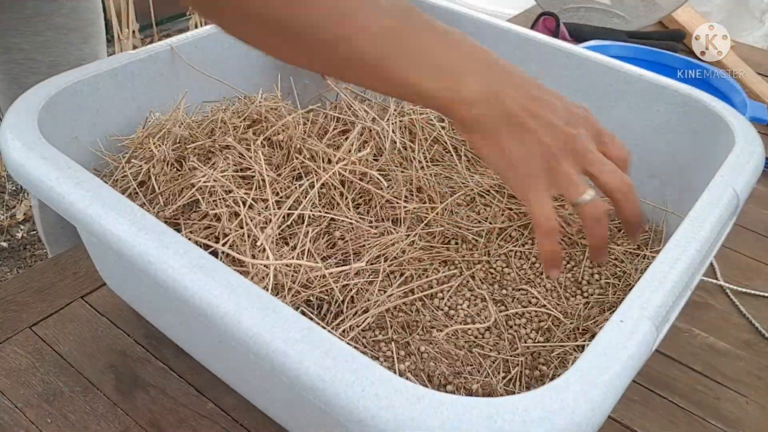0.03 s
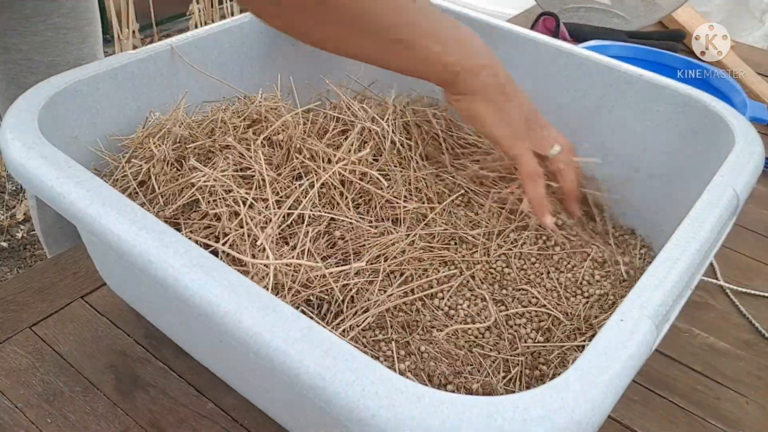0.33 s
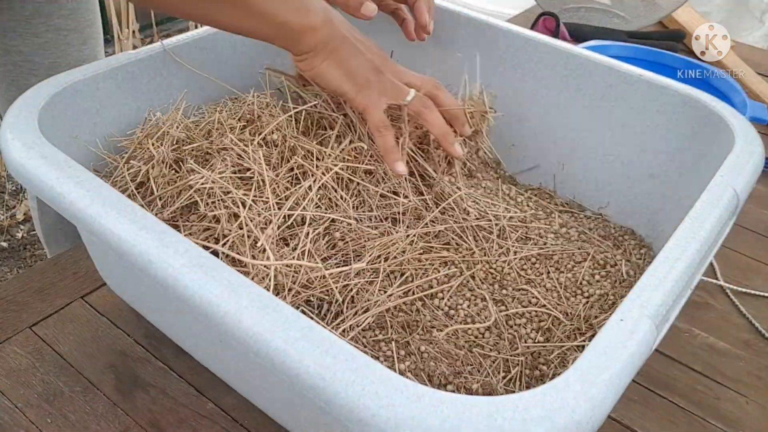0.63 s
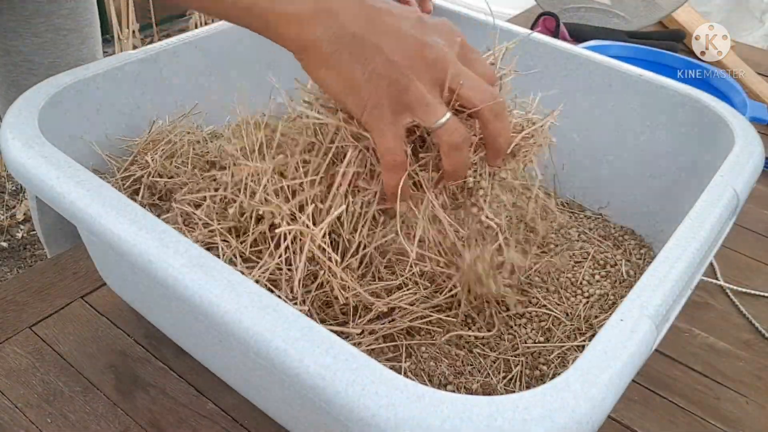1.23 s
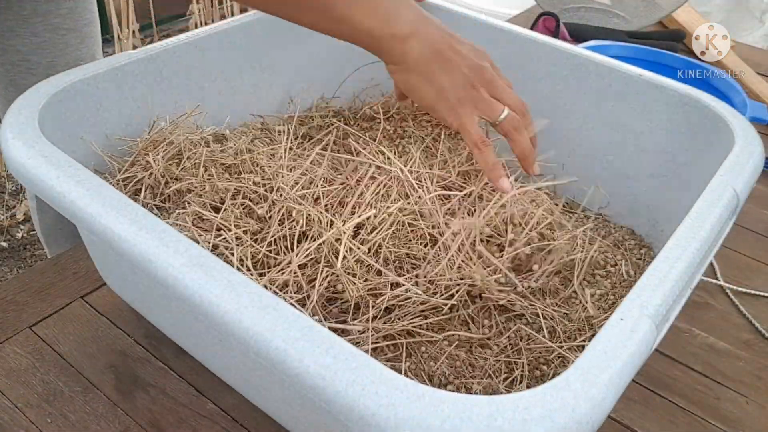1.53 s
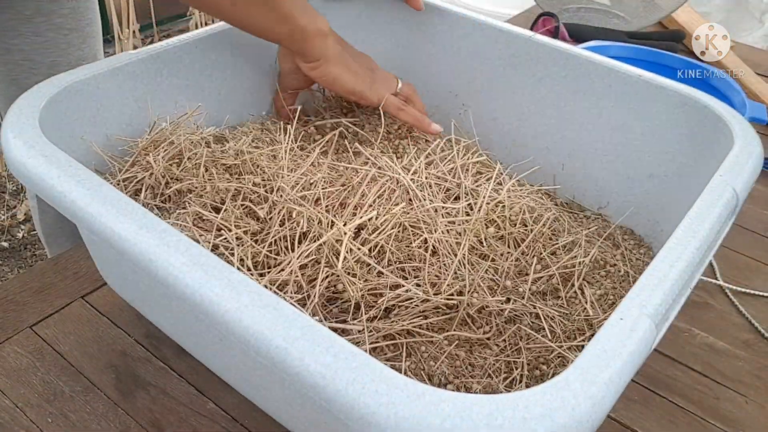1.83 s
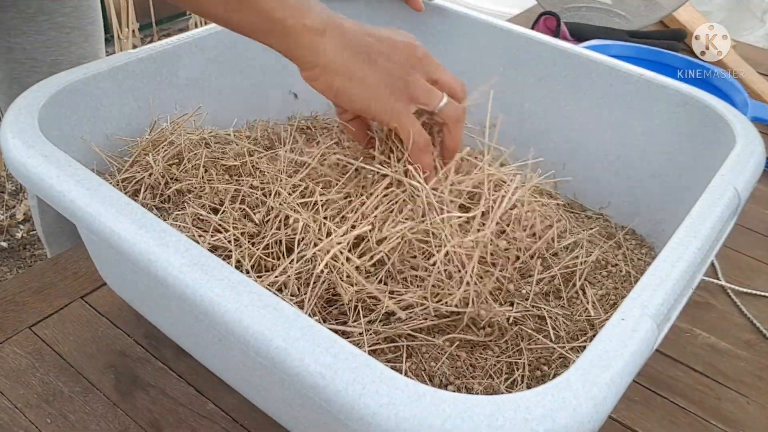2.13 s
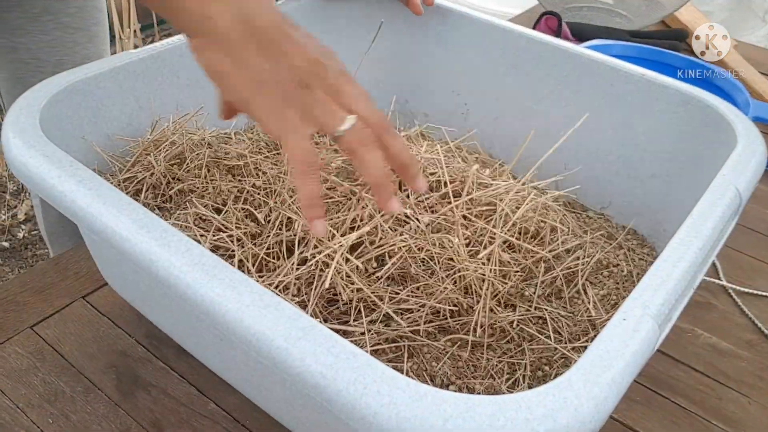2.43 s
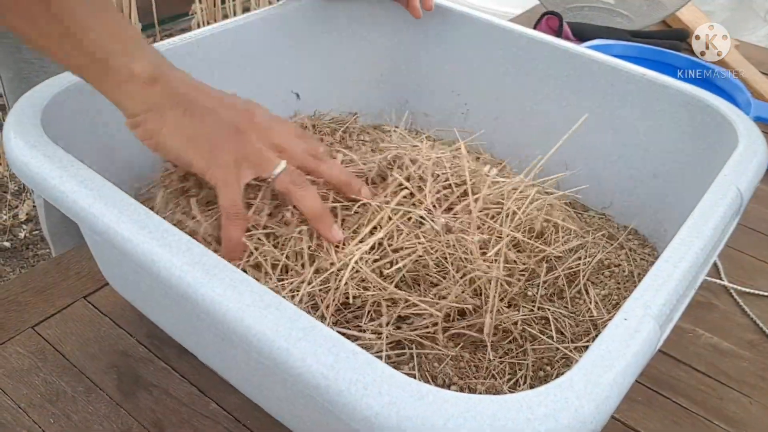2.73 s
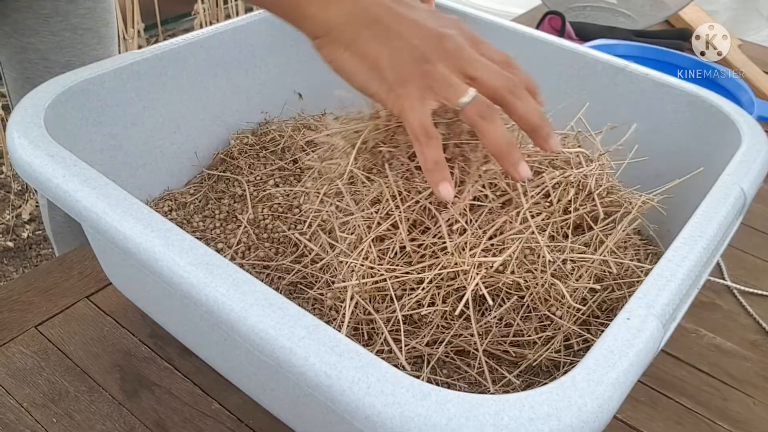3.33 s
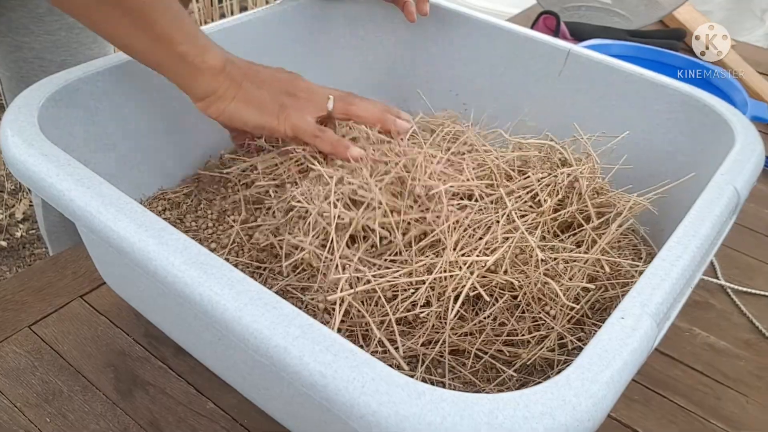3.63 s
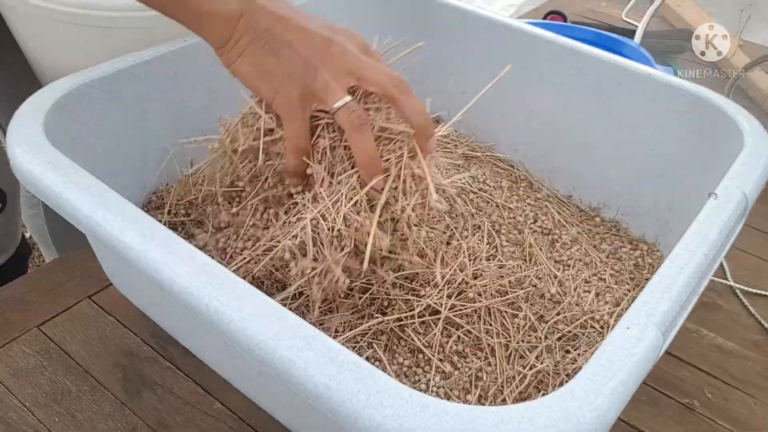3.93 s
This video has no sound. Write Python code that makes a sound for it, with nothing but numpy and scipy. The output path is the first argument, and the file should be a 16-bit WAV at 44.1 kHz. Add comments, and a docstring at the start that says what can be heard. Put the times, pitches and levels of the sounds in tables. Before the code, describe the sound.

Dry stalks and seeds rustle crisply under a hand, with dull knocks of a plastic tub.

```python
"""A dry, crisp rustle: a hand rakes and lifts coriander stalks and seeds in a plastic tub outdoors.
Thousands of tiny brittle impacts add up to this sound, which grows fuller as the fingers dig down to
the seeds. Now and then a stalk snaps, or slides on another and squeaks. The tub rocks and knocks on a
wooden deck, exciting the damped modes of tub and boards. A faint low rumble lies behind, joined
halfway by a distant drone."""
import sys
import numpy as np
from scipy import signal
from scipy.io import wavfile

SR = 44100
rng = np.random.default_rng(int(sys.argv[2]) if len(sys.argv) > 2 else 0)


def unload_audio(sound):
    """Save the sound as a 16-bit wav file, at the path given as the first command line argument."""
    columns = np.transpose(np.atleast_2d(sound))
    # keep every value between -1 and 1, then stretch to whole-number steps
    steps = np.round(np.clip(columns, -1, 1) * 32767)
    wavfile.write(sys.argv[1], SR, steps.astype(np.int16))


N = 176400
TIME = np.arange(N) / SR

# spectrum of a crisp tick: (frequency [Hz], relative density [dB])
TICK_SPECTRUM = [(4000, -20), (6000, -11), (9500, 6), (15000, 3.5)]


def rustle():
    """Superposition of impacts: stalks crackle, seeds roll beneath them and scrape along the tub."""
    # envelopes of stalks, pushed seeds and scrape: (time [s], relative level [dB])
    stalk_levels = [(0.0, -60.5), (0.08, -72), (0.17, -62), (0.21, -55), (0.24, -57.5), (0.32, -51),
                    (0.7, -56.5), (0.72, -55), (0.73, -54.5), (0.81, -56.5), (0.85, -50), (0.96, -50),
                    (0.97, -48), (1.02, -52.5), (1.09, -50), (1.14, -54.5), (1.39, -59), (1.44, -48),
                    (1.46, -49.5), (1.48, -46.5), (1.51, -58), (1.74, -48), (1.82, -54.5), (1.99, -49),
                    (2.02, -50.5), (2.24, -59), (2.28, -56.5), (2.41, -60.5), (2.46, -68), (2.48, -62),
                    (2.6, -62.5), (2.61, -54), (2.62, -54), (2.74, -48.5), (3.3, -61.5), (3.46, -55),
                    (3.49, -53), (3.59, -57.5), (3.68, -48.5), (3.72, -51), (3.94, -56), (4.0, -53)]
    seed_levels = [(0.0, -85), (0.09, -95), (0.11, -79), (0.13, -75), (0.22, -58), (0.33, -55.5),
                   (0.69, -68.5), (0.82, -67.5), (0.85, -63.5), (1.07, -57.5), (1.31, -71), (1.37, -91),
                   (1.48, -79), (1.5, -67), (1.57, -95), (1.6, -59), (1.74, -52.5), (1.76, -54),
                   (2.04, -61.5), (2.25, -80), (2.29, -82), (2.46, -93), (2.49, -81), (2.58, -83),
                   (2.61, -58), (2.72, -56), (2.94, -65.5), (3.04, -59.5), (3.07, -70), (3.21, -73.5),
                   (3.29, -88.5), (3.77, -58.5), (3.94, -64.5), (4.0, -58)]
    scrape_levels = [(0.0, -78.5), (0.09, -83), (0.11, -73.5), (0.18, -75), (0.21, -68), (0.38, -61.5),
                     (0.66, -81.5), (0.87, -69.5), (1.16, -68.5), (1.32, -82), (1.55, -80), (1.63, -52.5),
                     (1.64, -55), (1.77, -56.5), (2.14, -81), (2.53, -84), (2.73, -67.5), (2.97, -81.5),
                     (3.03, -67.5), (3.2, -82), (3.52, -80), (3.55, -74), (3.58, -72.5), (4.0, -72.5)]
    # their spectra: (frequency [Hz], relative density [dB])
    stalk_spectrum = [(4000, -13.5), (6000, -7), (7500, -5), (9500, 2), (11000, 1), (12500, -3.5),
                      (14000, -2.5), (15500, -7)]
    seed_spectrum = [(1500, -50), (2100, -11), (2700, 1.5), (4000, 1.5), (5500, 0.5), (7000, -12.5),
                     (10000, 1.5)]
    scrape_spectrum = [(500, 4), (700, 5), (950, 2), (1300, 8), (1650, -0.5), (2000, 7), (2500, 4.5),
                       (3200, -7)]
    # place of the moving hand: (time [s], relative left-right difference [dB])
    hand_pan = [(0.0, -5), (0.1, 3), (0.18, -5.5), (1.45, -5), (1.54, -6), (2.38, -5), (2.54, -3),
                (2.64, -4.5), (4.0, -5)]
    stalks = crackle(stalk_spectrum, per_s=3400, size_db=2.5, clump_db=0.5, patchy_db=1.18)
    seeds = crackle(seed_spectrum, per_s=2000, size_db=2, clump_db=-1, patchy_db=1.5)
    scrape = crackle(scrape_spectrum, per_s=2700, size_db=2, clump_db=1, patchy_db=2.17)
    stalks = from_db(in_time(stalk_levels)) * (from_db(3) * stalks + from_db(-12) * seed_ticks())
    seeds *= from_db(in_time(seed_levels) + 2)
    scrape *= from_db(in_time(scrape_levels) + 5.5)
    return (stalks + seeds) * panned(in_time(hand_pan) + 3) + scrape


def crackle(spectrum, per_s, size_db, clump_db, patchy_db):
    """Shot noise: each random contact is a sharp tick with a short tail between the tub's walls."""
    contacts = rng.random(N) < per_s / SR
    contact_db = size_db * np.minimum(rng.exponential(1, N), 5) + clump_db * drift(45)
    power = (contacts * from_db(contact_db + 2.5 * rng.standard_normal((2, N)))) ** 2  # at each ear
    tick = energy_decay(power, t60=0.0012)
    tail = from_db(6.5) ** 2 * energy_decay(power, t60=0.12)
    grains = np.sqrt(tick + tail) * rng.standard_normal((2, 2, N))
    return rms_one(sum(gain * from_db(patchy_db * drift(12.7)) * signal.sosfilt(sos, grains[k % 2])
                       for k, (sos, gain) in enumerate(bands(spectrum))))


def seed_ticks(per_s=70):
    """A sparse Poisson process: loose seeds hit dry stalks and are heard as separate bright ticks."""
    hits = rng.random(N) < per_s / SR
    size = hits * from_db(3 * np.clip(rng.standard_normal((2, N)), -2, 2))
    return rms_one(np.sqrt(energy_decay(size ** 2, t60=0.0044)) * noise(TICK_SPECTRUM, side_db=0))


def wall_reflections(direct, wander_s=0.00008):
    """Comb filtering: echoes reach each ear by paths that change slowly as the hand moves."""
    # echoes off the tub's walls: (delay [s], level relative to the direct sound [dB])
    paths = [(.0011, -11.5), (.0023, -13), (.0037, -14), (.0058, -11)]
    echoes = np.zeros_like(direct)
    for ear in range(2):
        for delay, db in paths:
            lag = delay * rng.uniform(0.85, 1.15) + wander_s * drift(0.63)
            echoes[ear] += from_db(db) * np.interp(TIME - lag, TIME, direct[ear])
    return (direct + echoes) / np.sqrt(1 + sum(from_db(db) ** 2 for _, db in paths))


def wall_rub():
    """Forced vibration: friction drives a hollow resonance of the tub's walls."""
    # envelope of the rubbing: (time [s], relative level [dB])
    levels = [(0, -68), (.15, -63.5), (.25, -57.5), (.45, -62.5), (.6, -76), (.8, -61.5), (1.1, -64.5),
              (1.35, -76.5), (1.6, -73), (1.9, -61), (2.15, -87), (2.55, -73), (2.65, -60), (2.8, -62.5),
              (2.92, -75), (3.08, -57.5), (3.25, -87), (3.45, -67.5), (3.7, -62.5), (4, -66.5)]
    # friction noise: (frequency [Hz], relative density [dB])
    spectrum = [(170, -4), (280, -3), (360, 0), (450, -5.5), (570, -17), (800, -18)]
    hollow = rms_one(ring(rng.standard_normal(N), hz=420, t60=0.028)) * panned(db=3.5)
    friction = noise(spectrum, side_db=-9)
    return from_db(in_time(levels)) * (from_db(-6.5) * hollow + from_db(-2) * friction)


def sharp_ticks(t60=0.032):
    """Broadband transients: the click of the first knock, then snapping stalks; thick ones crunch."""
    # sharp, crisp ticks: (time [s], crisp level [dB], crunch level [dB])
    ticks = [(0.107, -57, -57), (0.718, -41.5, -63), (0.833, -53, -60), (0.858, -41, -60),
             (0.971, -49, -59), (1.427, -40.5, -76), (1.492, -48, -62), (1.570, -47, -76),
             (2.293, -47, -69), (2.602, -41.5, -50.5), (3.163, -52.5, -66), (3.497, -52, -75)]
    # the crunch: (frequency [Hz], relative density [dB])
    crunch_spectrum = [(1400, -10), (2800, 0), (4500, -4), (7000, 3)]
    times, crisp_db, crunch_db = np.transpose(ticks)
    crisp = decays(times, crisp_db, t60) * noise(TICK_SPECTRUM, side_db=-1.5)
    return crisp + decays(times, crunch_db, t60) * noise(crunch_spectrum, side_db=0)


def squeaks(bandwidth_hz=140):
    """Frictional excitation: a stalk sliding on another rings roughly in one narrow resonance."""
    # slides: (midpoint [s], duration [s], frequency [Hz], level [dB])
    slides = [(1.487, .025, 5820, -59), (1.581, .04, 1300, -61.5), (2.52, .04, 8060, -60),
              (2.555, 0.046, 8740, -62), (3.779, 0.042, 6600, -52.5), (3.78, .04, 3500, -59),
              (3.812, .05, 2700, -61)]
    out, radius = 0, np.exp(-np.pi * bandwidth_hz / SR)
    for middle, duration, hz, db in slides:
        feedback = [1, -2 * radius * np.cos(2 * np.pi * hz / SR), radius ** 2]
        tone = signal.lfilter([1, 0, -1], feedback, rng.standard_normal((2, N)))
        envelope = np.exp(-np.minimum((2 * (TIME - middle) / duration) ** 2, 20))
        out += from_db(db) * envelope * rms_one(tone)
    return out


def knocks(swell_cycles=3.32):
    """Modal response to impact: each knock cracks, rings tub and boards and leaves a dull rattle."""
    # tub on deck: (time [s], relative level [dB], board boom [dB], tub floor [dB], tub walls [dB],
    # clack [dB], contact cutoff [Hz])
    blows = [(0.109, -35, -6, -39, -1.5, -5.5, 1100), (0.202, -52, -14, -14, 0, 6, 1500),
             (1.621, -29, 1, -3.5, -5, -10, 2200), (1.7270, -24.5, -11, -4, -2.5, -8.5, 2200),
             (1.7634, -35.5, 11.5, -5, 3, -12, 1800), (2.625, -48.5, 3, 3.5, -9.5, -16, 900),
             (2.987, -55, -12, -5, 1, -15, 900), (3.0269, -39, -4.5, -35, 0, -4, 900),
             (3.5444, -23.5, 6.5, 5.5, -16, -9, 1800)]
    # modes of tub and boards: (frequency [Hz], relative level [dB], T60 [s])
    modes = [(131.4, 2, 0.096), (154, 0, 0.066), (208, -10, 0.047), (266, -10, 0.039), (299, -5, 0.06),
             (394, -0.5, 0.06), (422.6, 0, 0.066), (487, -25, 0.2), (540, -14, 0.14), (647, -20, 0.2),
             (719, -11.5, 0.092), (837, -15.5, 0.21), (1021, -16.5, 0.18), (1177, -20, 0.15),
             (1350, -35, .05)]
    # borders between boom, floor, walls and clack: (frequency [Hz])
    part_edges = [190, 340, 600]
    # rattle and hard first contact: (frequency [Hz], relative density [dB])
    rattle_spectrum = [(100, -6), (200, -7), (400, 4), (600, -10.5), (1000, -12), (1500, -38), (2500, -39)]
    crack_spectrum = [(450, -2), (700, 4.5), (1000, -1), (1500, -17), (2500, -38)]
    times, db, *parts_db, contact_hz = np.transpose(blows)
    body = 0
    for k, (hz, mode_db, t60) in enumerate(modes):
        part = np.searchsorted(part_edges, hz)
        strength = from_db(db + mode_db + parts_db[part] + rng.normal(0, 0.89, len(times)))
        strength /= np.hypot(1, (hz / contact_hz) ** 2)
        impulses = np.bincount((times * SR).astype(int), strength, N)
        polarity = (-1, 1, -1, (-1) ** k)[part]
        # a mode builds up as the blow spreads through the tub
        mode = ring(impulses, hz, t60) - ring(impulses, hz, swell_cycles / hz)
        body += polarity * mode * panned(db=4.5 if part > 1 else 1.7)
    rattle = decays(times, db - 15, t60=0.25) * noise(rattle_spectrum, side_db=-5)
    crack = decays(times, db + parts_db[-1] - 9.5, t60=0.036) * noise(crack_spectrum, side_db=5)
    dull = signal.sosfilt(signal.butter(2, 1170, fs=SR, output="sos"), body + rattle)
    return signal.sosfilt(signal.butter(2, 90, "high", fs=SR, output="sos"), dull) + crack


def background(drone_start_s=2.06, drone_rise_s=0.13):
    """Ambient noise: a low rumble and a far drone under slow amplitude and frequency modulation."""
    # outdoor air: (frequency [Hz], relative density [dB])
    air_spectrum = [(22, -30), (38, 2), (60, 6.5), (90, -1), (130, -4), (200, -12.5), (400, -26.5),
                    (800, -34), (2000, -53), (8000, -53)]
    # partials of the drone: (frequency [Hz], level [dB])
    partials = [(38.5, -64), (90, -60)]
    drone = 0
    for hz, db in partials:
        amplitude = np.sqrt(2) * from_db(db + 3.4 * drift(0.67))
        pitch_hz = hz * (1 + 0.0184 * drift(2.5))
        drone += amplitude * np.sin(2 * np.pi * np.cumsum(pitch_hz) / SR)
    onset = np.clip((TIME - drone_start_s) / drone_rise_s, 0, 1)
    return from_db(-54.5) * noise(air_spectrum, side_db=-14) + onset * drone


def ring(force, hz, t60):
    """Damped oscillator: a unit impulse starts a decaying sine of amplitude 1."""
    radius, angle = from_db(-60 / (t60 * SR)), 2 * np.pi * hz / SR
    return signal.lfilter([0, np.sin(angle)], [1, -2 * radius * np.cos(angle), radius ** 2], force + 1e-18)


def decays(times, levels_db, t60):
    """Exponential damping: an envelope that jumps at each time and dies away."""
    return sum(from_db(db - 60 * np.abs(TIME - start) / t60) * (TIME >= start)
               for start, db in zip(times, levels_db))


def energy_decay(power, t60):
    """Conservation of energy: each impulse is spread over an exponential decay."""
    retained = from_db(-60 / (t60 * SR)) ** 2
    return signal.lfilter([1 - retained], [1, -retained], power + 1e-18)


def noise(spectrum, side_db):
    """Spectral shaping: stereo noise of unit rms, with neighbouring bands drawn independently."""
    mid, side = rng.standard_normal((2, 2, 1, N))
    white = mid + from_db(side_db) * side * [[1], [-1]]
    return rms_one(sum(gain * signal.sosfilt(sos, white[k % 2])
                       for k, (sos, gain) in enumerate(bands(spectrum))))


def bands(spectrum):
    """Constant-Q filter bank: third-octave filters across a spectrum, each with its stereo gain."""
    # lean of each band to one side: (frequency [Hz], left-right difference [dB])
    balance = [(60, 0.5), (92, -1.5), (140, 1.5), (210, -0.5), (330, 0), (500, 9.5), (770, -5), (1170, -1),
               (1790, -0.5), (2740, 4.5), (4190, 0), (6410, -0.5), (9810, 5.5), (15000, -11)]
    edges = 20 * 2 ** (np.arange(30) / 3)
    for low, high in zip(edges, edges[1:]):
        if high > spectrum[0][0] and low < spectrum[-1][0]:
            hz = np.sqrt(low * high)
            gain = from_db(at_hz(spectrum, hz)) * panned(at_hz(balance, hz))
            yield signal.butter(2, [low, high], "band", fs=SR, output="sos"), gain


def drift(corner_hz):
    """Random fluctuation: low-passed noise of unit rms."""
    hop, settle = 40, 2000
    pole = np.exp(-2 * np.pi * corner_hz * hop / SR)
    white = rng.standard_normal(N // hop + settle + 2)
    slow = signal.lfilter([1], [1, -2 * pole, pole ** 2], white)[settle:]
    return np.interp(np.arange(N) / hop, np.arange(len(slow)), rms_one(slow))


def panned(db):
    """Interaural level difference as left and right gains."""
    return from_db(np.array([[0.5], [-0.5]]) * db)


def at_hz(spectrum, hz):
    """Interpolation on a log-frequency axis."""
    frequencies, db = np.transpose(spectrum)
    return np.interp(np.log(hz), np.log(frequencies), db)


def in_time(rows):
    """Linear interpolation of a curve at every sample."""
    return np.interp(TIME, *np.transpose(rows))


def from_db(db):
    """Decibels to amplitude ratio."""
    return 10 ** (np.asarray(db) / 20)


def rms_one(x):
    """Normalisation to unit rms."""
    return x / np.sqrt(np.mean(x ** 2) + 1e-20)


def scene():
    """Linear superposition: the tub close by, the open air behind."""
    return wall_reflections(rustle()) + wall_rub() + sharp_ticks() + squeaks() + knocks() + background()


def record(dry):
    """Band limiting: a steep low-pass cuts the top of the treble."""
    return signal.sosfilt(signal.ellip(12, 0.1, 70, 15600, fs=SR, output="sos"), dry)


dry = scene()
out = record(dry)
unload_audio(out)
```